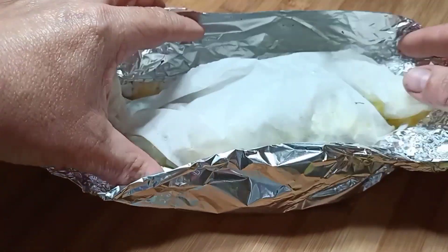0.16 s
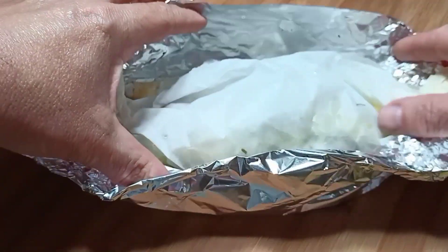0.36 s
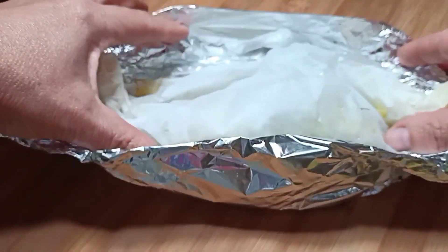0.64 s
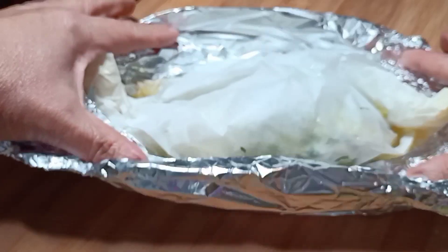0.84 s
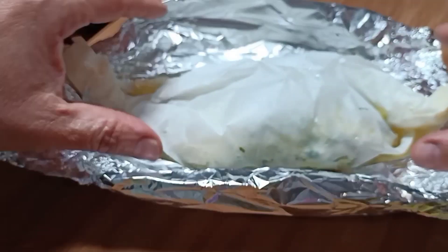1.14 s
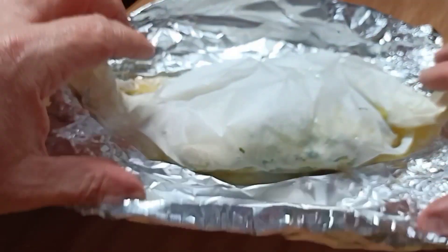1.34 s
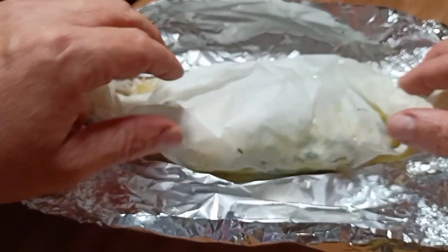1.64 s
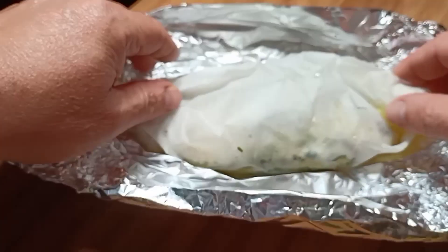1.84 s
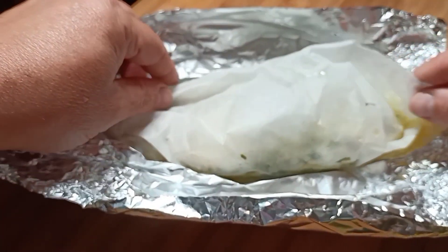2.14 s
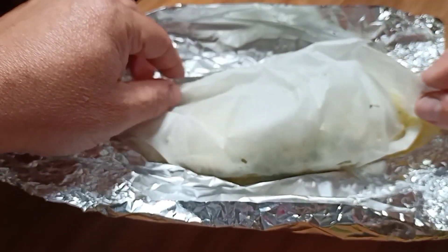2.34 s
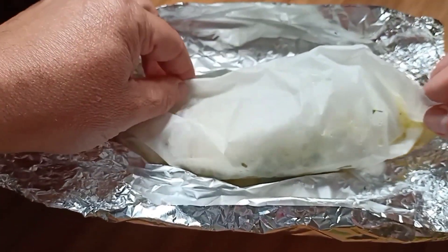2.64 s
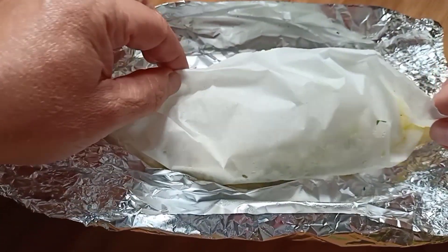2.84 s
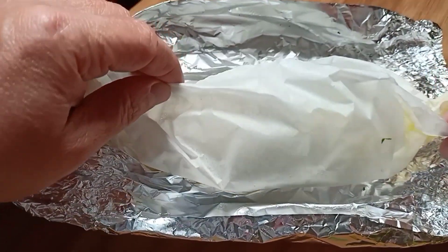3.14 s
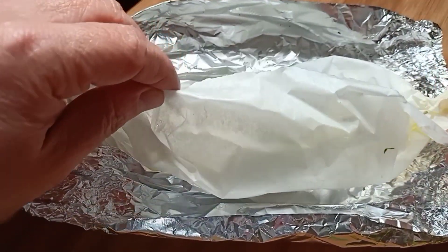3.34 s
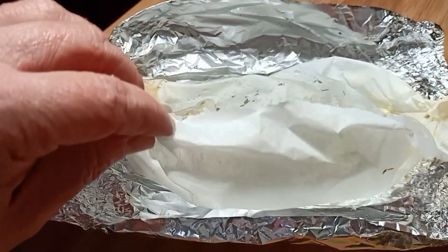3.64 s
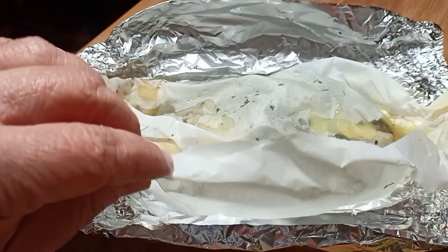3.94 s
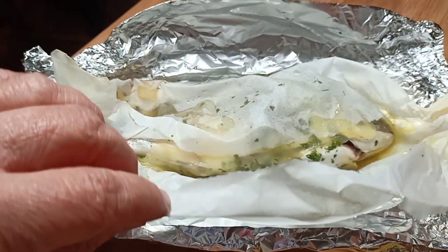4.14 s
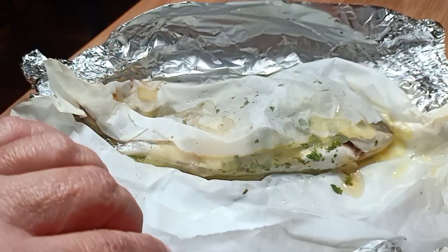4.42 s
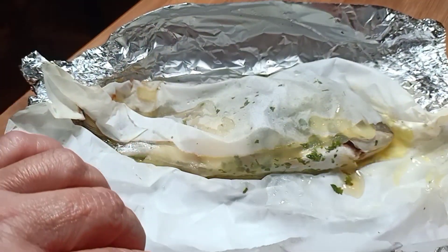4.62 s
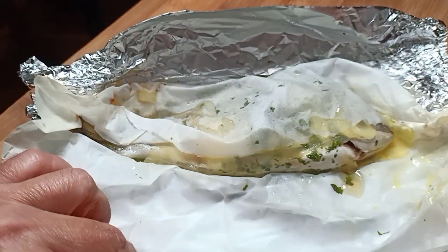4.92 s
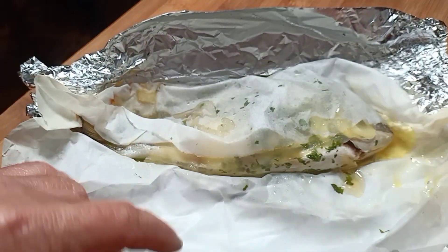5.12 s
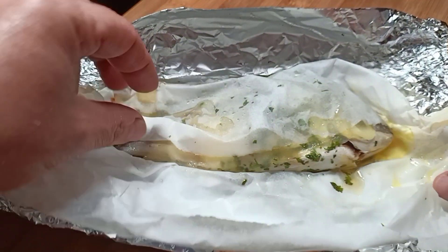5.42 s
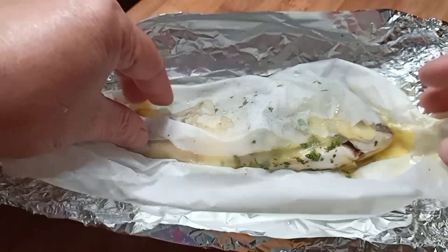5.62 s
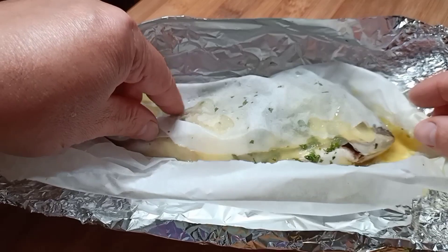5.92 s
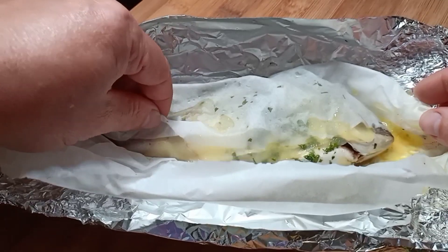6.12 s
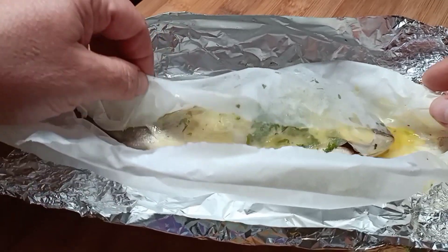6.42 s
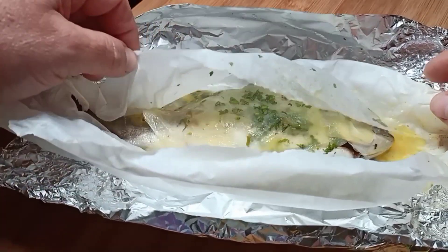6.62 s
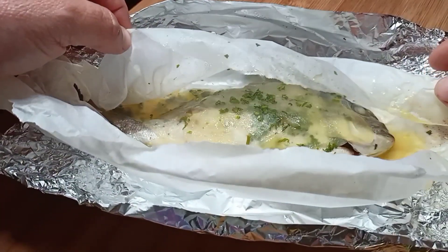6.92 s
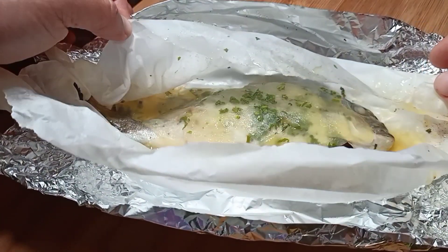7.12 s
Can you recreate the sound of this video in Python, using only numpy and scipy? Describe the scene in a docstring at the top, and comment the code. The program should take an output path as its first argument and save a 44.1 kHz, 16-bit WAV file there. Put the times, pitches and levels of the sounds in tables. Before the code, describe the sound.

Aluminium foil and baking paper crinkle as hands unwrap a food parcel up close, loud crackles first, then soft rustling and dense crackling.

```python
"""Hands open a parcel of aluminium foil and baking paper on a wooden kitchen table, close to a phone.
Hard pulls come first: creases buckle as random clicks, ridges snap as damped tones, panels pop hollowly.
From 2 s the pulls are gentler and the paper, held taut, rings; from 3.2 s the crackle is dense and slack.
From 5.4 s taut paper again colours softer pulls, and the last snaps follow near 7.2 s. Now and then the
parcel bumps the table in filtered noise; a short kitchen reverberation and a faint hush lie behind it all."""
import sys
import numpy as np
from scipy import signal
from scipy.fft import rfft, irfft
from scipy.io import wavfile
from scipy.ndimage import uniform_filter1d

SR = 44100
rng = np.random.default_rng(int(sys.argv[2]) if len(sys.argv) > 2 else 0)


def transcribe(signal):
    """Save signal, clipped to [-1, 1], as a 16-bit WAV file at the path in sys.argv[1]."""
    frames = np.atleast_2d(signal).T
    limited = np.clip(frames, -1, 1)
    pcm = np.round(limited * 32767).astype(np.int16)
    wavfile.write(sys.argv[1], SR, pcm)


N = 320166
TIME = np.arange(N) / SR
TOP_HZ = 15500

# radiation spectrum of the crumpling sheet: (frequency [Hz], level [dB])
SHEET_SPECTRUM = [(90, -28), (330, -2), (620, 1), (1000, -3), (1450, -1), (2650, -1.3), (3300, -13.5),
                  (4500, -14.5), (7000, -27), (7600, -38.5), (12500, -47), (15000, -52)]


def wrapping():
    """Crackling noise: harder pulls break more creases a second; broad panels sound low, tight folds high."""
    fold_db, panel_db, tick_db = effort()
    creases_per_s = 1200 * undb(0.2 * (fold_db - fold_db.mean()))
    creases = pinched(crumple(creases_per_s))
    panels = driven(band(creases, 130, 830, order=4), panel_db)
    folds = driven(band(creases, 826, 3960, order=6), fold_db)
    ticks = driven(band(creases, 3540, TOP_HZ, order=4), tick_db)
    return panels + folds + ticks


def effort(attack_s=0.0018, jerk_db=2, jerks_per_s=22):
    """Power addition: each pull rises, holds and decays exponentially; overlapping pulls add their power.

    Returns the levels in dB of folds, panels and ticks."""
    # pulls of the hands: (start [s], length [s], crinkling folds [dB], flexing panels [dB over the folds],
    # finest ticks [dB over the folds])
    pulls = [(0.0, 0.073, -46.5, 4, -8), (0.082, 0.21, -51, 3, -10.5), (0.311, 0.21, -48.5, 4.5, -9),
             (0.477, 0.41, -48.5, -3, -11.5), (0.517, 0.029, -36.5, -0.5, -12),
             (0.572, 0.077, -39, 2.5, -15.5), (1.028, 0.26, -63.5, -41, 3), (1.071, 0.13, -47.5, 0, -7.5),
             (1.442, 0.037, -51, 5.5, -9.5), (1.5, 0.27, -53, -1, -13.5), (1.819, 0.1, -53.5, -1, -10),
             (2.082, 0.045, -56, -5.5, -15), (2.277, 0.44, -66, -12.5, -4.5),
             (2.464, 0.055, -58.5, -9, -14), (2.671, 0.11, -63.5, 3.5, -12.5),
             (2.868, 0.721, -56, -4.5, -14.5), (2.937, 0.21, -57.5, 2.5, -12), (3.21, 0.15, -55.5, -2, -46),
             (3.332, 0.046, -53.5, 1, -6.5), (3.568, 0.17, -55, 3.5, -8.5), (3.738, 0.092, -51, 1.5, -14.5),
             (3.878, 0.42, -49, -0.5, -10), (4.368, 0.34, -52.5, -3, -7.5), (4.547, 0.1, -48, -1.5, -8.5),
             (4.726, 0.255, -52, -9, -7), (5.041, 0.13, -51, -21.5, -13.5), (5.184, 0.17, -54, 3.5, -13.5),
             (5.584, 0.25, -56, -10, -12.5), (5.769, 0.063, -63, 1.5, -3), (5.926, 0.12, -67.5, -0.5, -1.5),
             (6.139, 0.014, -53.5, -3, -12.5), (6.151, 0.16, -63, -1.5, -8.5), (6.358, 0.26, -56, -4, -12),
             (6.493, 0.034, -53, 7.5, -12.5), (6.642, 0.014, -48, -1.5, -15.5),
             (6.702, 0.25, -57, -3.5, -17), (6.861, 0.03, -50, 4.5, -10.5), (6.94, 0.1, -54, -1.5, -10.5),
             (7.058, 0.16, -51, 1, -10.5)]
    # decay after a pull, the hands damping the broad panels soonest:
    # (folds [dB/s], panels [dB/s], ticks [dB/s])
    release_rates = (289, 380, 242)
    # the sheet settling between pulls: (folds [dB], panels [dB], ticks [dB])
    settling_levels = (-68, -85, -82)
    power = undb(settling_levels)[:, None] ** 2 * np.ones(N)
    for start_s, length_s, fold_db, panel_db, tick_db in pulls:
        t = TIME[:int(length_s * SR) + SR // 2]
        rise = np.minimum(t / attack_s, 1)
        since_release_s = np.maximum(t - length_s, 0)
        for track, relative_db, release in zip(power, (0, panel_db, tick_db), release_rates):
            stroke = rise * undb(fold_db + relative_db - release * since_release_s)
            add(track, start_s, stroke ** 2)
    # the sheet yields unevenly
    return 10 * np.log10(power) + jerk_db * walk(jerks_per_s)


def crumple(rate, wander_db=4.0, rub=0.05, spread_db=4.8, patchy_db=2.5, lag_s=0.00035,
            sharpness=4.2, octaves=0.5, count=30):
    """Impulse excitation of modes: creases buckle at random, each ringing short modes around its own pitch."""
    at = np.flatnonzero(rng.random(N) < rate / SR)
    # many small creases and a few large
    crease_size = undb(spread_db * np.minimum(rng.exponential(size=N)[at], 2.4))
    pitch_hz = 100 * 160 ** rng.random(N)[at]
    out = np.zeros(N)
    for hz in np.geomspace(150, 14000, count):
        noise = rng.standard_normal(N)
        nearness = np.exp(-0.5 * (np.log2(hz / pitch_hz) / octaves) ** 2)
        # a buckle runs along its crease, so its modes start a moment apart
        lag = (lag_s * SR * np.abs(noise[at])).astype(int)
        start = np.minimum(at + lag, N - 1)
        patchiness = undb(patchy_db * np.minimum(noise[at - 1], 2))
        strength = crease_size * nearness * patchiness * np.sign(noise[at])
        # sheet sliding on sheet rubs the same modes
        kicks = np.bincount(start, strength, N) + rub * noise
        mode = signal.iirpeak(hz, sharpness, fs=SR)
        ringing = signal.lfilter(*mode, signal.lfilter(*mode, kicks))
        # as the sheet bends, different facets take over the sound
        out += ringing * undb(wander_db * walk(rate=20))
    return colour(out, SHEET_SPECTRUM)


def driven(x, db):
    """Energy balance: the hands feed in the power, and the creases of each short moment share it."""
    power = uniform_filter1d(uniform_filter1d(x ** 2, size=2600), size=1300)
    return undb(db) * x / np.sqrt(power + 0.029 * np.mean(power))


def pinched(x, slack=0.3, drift=0.07, wander_db=4):
    """Stretched-membrane resonance: paper held by fingertips rings at pitches that shift with its tension."""
    # fingertips hold the paper taut: (from [s], to [s])
    pinches = [(1.97, 3.2), (5.42, 6.85)]
    # resonances of the taut paper, before drift and wander: (frequency [Hz], width [Hz], level [dB])
    taut_modes = [(360, 33, -8), (608, 66, 3.5), (854, 50, -1), (1845, 98, 2), (2680, 140, -6.5),
                  (3200, 170, -5), (4060, 430, -7.5)]
    held = sum(1.0 * ((TIME > begin_s) & (TIME < end_s)) for begin_s, end_s in pinches)
    grip = uniform_filter1d(held, SR // 10)
    taut = np.zeros(N)
    for hz, width_hz, db in taut_modes:
        gain = undb(db + wander_db * walk(6.2))
        moving_hz = hz * np.exp(drift * walk(4.6))
        taut += gain * ring(x, moving_hz, width_hz)
    # under full grip the unresonant sound drops to the slack gain
    return x + grip * (taut + (slack - 1) * x)


def snaps(ring_s=0.0011, crack_s=0.001, softness=0.85, size=1400):
    """Snap-through buckling: a ridge flips with a sharp noise crack and a few cycles of damped modes."""
    # ridges, levels being peaks at the sheet: (time [s], ring level [dB], ring pitch [Hz], crack level [dB])
    ridges = [(0.1743, -29, 1710, -38.5), (0.3156, -35, 2550, -35), (0.5265, -28, 2290, -33),
              (0.5776, -25, 2020, -37), (0.603, -18, 2100, -27), (0.6394, -23.5, 2500, -40),
              (0.6963, -21, 1900, -34), (1.1301, -25, 1890, -38), (1.2435, -27, 1930, -48),
              (1.287, -36.5, 2970, -33.5), (1.4505, -33, 2130, -60), (1.908, -35.5, 2076, -53.5),
              (2.2318, -54, 3210, -65), (2.2878, -36.5, 1930, -44), (2.434, -45.5, 1784, -62.5),
              (2.493, -40.5, 2184, -60), (2.522, -48, 1920, -54.5), (2.533, -49, 2630, -46),
              (2.7223, -43.5, 1690, -47), (2.7798, -40.5, 1797, -78.5), (2.8513, -67.5, 1880, -38.5),
              (2.9354, -36, 1770, -41), (3.2159, -24.5, 1320, -37.5), (3.5798, -27.5, 1120, -42),
              (3.6516, -30.5, 1810, -42.5), (3.7661, -28.5, 1070, -41), (3.8267, -31, 1780, -32.5),
              (3.884, -28.5, 1650, -58), (3.908, -27, 2340, -34), (4.125, -30.5, 2230, -35.5),
              (4.195, -28, 2600, -35), (4.3822, -30, 2900, -59), (4.4573, -35, 1240, -43),
              (4.55, -28.5, 2490, -45), (4.5696, -23.5, 2550, -29.5), (4.6005, -28.5, 1760, -32),
              (4.608, -37, 2500, -40), (4.66, -30, 1430, -36), (4.7012, -36, 1160, -34),
              (4.7444, -37, 2380, -47), (4.809, -31.5, 1190, -34), (4.833, -39, 3500, -41),
              (4.992, -28, 1270, -31), (5.039, -33, 2270, -41), (5.0596, -30, 1530, -37),
              (5.095, -34.5, 1820, -36), (5.3102, -28, 1220, -40.5), (5.468, -41.5, 2570, -49),
              (5.5967, -51, 2810, -41), (5.6401, -47, 1920, -60.5), (5.6725, -36.5, 2710, -39),
              (5.8205, -62, 2560, -37), (5.927, -59, 2710, -56), (5.997, -63, 3300, -54.5),
              (6.0135, -43.5, 1770, -59), (6.1478, -39.5, 1874, -36.5), (6.2555, -36, 2580, -53.5),
              (6.3488, -33.5, 2790, -44), (6.434, -38.5, 2130, -37.5), (6.476, -32.5, 2000, -40),
              (6.835, -39, 2090, -41.5), (6.8825, -28.5, 2420, -45), (7.125, -27, 2200, -31.5),
              (7.195, -28.5, 1830, -40)]
    out, t = np.zeros(N), np.arange(size) / SR
    for s, ring_db, hz, crack_db in ridges:
        # a hard flip is a short click, a gentle one is slower and rings longer
        decay_s = ring_s * undb(-softness * np.clip(ring_db + 35.0, -10, 6))
        # a bent facet has a mode on either side of its strongest one, fainter in a gentle flip
        ratios = np.exp(np.array([0, -1, 0.5]) * rng.uniform(0.49, 1, size=3))
        weights = np.array([2.2 * decay_s / ring_s + 1, 1, 1])
        modes = weights @ np.sin(2 * np.pi * hz * ratios[:, None] * t)
        note = band(modes * np.sqrt(t) * np.exp(-t / decay_s), 770, 3800, order=3)
        burst = rng.standard_normal(size) * t * np.exp(-t / crack_s)
        crack = band(colour(burst, SHEET_SPECTRUM), 3200, TOP_HZ)
        note_part = undb(ring_db) * note / np.abs(note).max()
        crack_part = undb(crack_db) * crack / np.abs(crack).max()
        add(out, s, note_part + crack_part)
    return out


def pops(rise_cycles=0.63, softness=0.41, size=2200):
    """Volume displacement: a whole panel turns over and pushes the air in a few damped cycles."""
    # panels of paper and foil: (time [s], envelope level before the band-pass [dB], pitch [Hz])
    popping_panels = [(0.172, -35, 473), (0.465, -21.5, 435), (0.536, -24.5, 573), (0.585, -23, 573),
                      (0.892, -39, 410), (1.152, -42, 525), (1.501, -32, 565), (2.472, -43, 572),
                      (2.762, -48, 416), (2.948, -35.5, 706), (3.1, -36.5, 510), (3.2155, -35.5, 830),
                      (3.386, -34.5, 600), (3.579, -35.5, 600), (3.591, -32.5, 413), (3.651, -30.5, 590),
                      (3.764, -27.5, 614), (3.882, -28.5, 520), (4.047, -30, 840), (4.0475, -31.5, 351),
                      (4.279, -37, 626), (4.567, -30, 557), (6.141, -41, 726), (6.2805, -48, 820),
                      (6.495, -40.5, 775), (6.504, -36, 528), (6.536, -34.5, 522), (6.622, -31, 592),
                      (6.784, -43, 830), (7.074, -37, 530), (7.126, -37, 442), (7.17, -37, 454)]
    out, t = np.zeros(N), np.arange(size) / SR
    for s, db, hz in popping_panels:
        # a gentle pop swings on for longer
        age = hz * t / (rise_cycles * undb(-softness * min(db + 26, 0)))
        upper_hz = hz * rng.uniform(1.22, 1.92)
        swing = np.sin(2 * np.pi * hz * t) + 0.48 * np.sin(2 * np.pi * upper_hz * t)
        add(out, s, undb(db) * age * np.exp(1 - age) * swing)
    return band(out, 200, 4000)  # a thin sheet radiates little bass


def tray(x, direct_db=-0.5):
    """Forced resonance: the stiff foil tray under the paper rings briefly with whatever moves in it."""
    # resonances of the tray: (frequency [Hz], width [Hz], level [dB])
    tray_modes = [(329.5, 30, -6), (908, 9.8, -9.5), (1900, 51, -16.5), (2510, 86, -11)]
    ringing = sum(undb(db) * ring(x, np.full(N, hz), width_hz) for hz, width_hz, db in tray_modes)
    return undb(direct_db) * x + ringing


def nudges(decay_s=0.029, size=9000):
    """Damped impact: the soft, heavy parcel shifts on the table with a dull bump of low noise."""
    # bumps before the kitchen's reverberation: (time [s], peak level [dB])
    bumps = [(0.575, -33), (1.157, -41), (1.448, -42.5), (1.5, -38.5), (3.586, -41), (3.751, -46.5),
             (4.035, -43.5), (4.179, -45), (6.625, -54)]
    out, t = np.zeros(N), np.arange(size) / SR
    for s, db in bumps:
        bump = band(rng.standard_normal(size) * np.exp(-t / decay_s), 86, 380)
        add(out, s, undb(db) * bump / np.abs(bump).max())
    return out


def kitchen(x, t60_s=0.47, tail_db=-5, gap_s=0.0059, size=22000):
    """Exponential reverberation: cupboards and walls return a dense, bright, short tail with little bass."""
    t = np.arange(size) / SR
    tail = rng.standard_normal(size) * undb(-60 * t / t60_s) * (t > gap_s)
    # unit energy before the band-pass
    tail = band(tail / np.linalg.norm(tail), 520, 5600, order=1)
    return x + undb(tail_db) * signal.fftconvolve(x, tail)[:N]


def still_air(rms_db=-64.5):
    """Stationary broadband noise: the faint, dull hush of the room."""
    hush = colour(rng.standard_normal(N), [(45, -11.5), (150, -7.5), (2500, -6.5), (8000, -36)])
    return undb(rms_db) * hush / hush.std()


def suppress(x, memory=0.93, depth_db=-10, size=704):
    spectrum = signal.stft(x, nperseg=size)[2]
    power = np.abs(spectrum) ** 2
    # the quietest moments of each band give its hush
    hush = np.quantile(uniform_filter1d(power, size=10, axis=1), 0.03, axis=1)
    passed, gains = 0, []
    for now in power.T / (hush + 1e-20):
        excess = memory * passed + (1 - memory) * np.maximum(now - 1, 0)
        gain = np.maximum(excess / (1 + excess), undb(depth_db))
        gains.append(gain)
        passed = gain ** 2 * now
    return signal.istft(spectrum * np.transpose(gains))[1][:N]


def ring(x, hz, width_hz):
    """Heterodyne resonator: one resonance whose centre may move, with gain 1 at the centre."""
    turn = np.exp(2j * np.pi * np.cumsum(hz) / SR)
    keep = np.exp(-np.pi * width_hz / SR)
    envelope = signal.lfilter([1 - keep], [1, -keep], x / turn)
    return 2 * np.real(turn * envelope)


def colour(x, points, size=2048):
    """Minimum-phase filter with the given (Hz, dB) outline, so that clicks keep their sharp fronts."""
    hz, db = np.transpose(points)
    log_hz = np.log(np.linspace(1, SR / 2, size // 2 + 1))
    cepstrum = irfft(np.log(undb(np.interp(log_hz, np.log(hz), db))))
    # folding the cepstrum onto positive time makes the filter causal
    cepstrum[1:size // 2] *= 2
    cepstrum[size // 2 + 1:] = 0
    impulse_response = irfft(np.exp(rfft(cepstrum)))
    return signal.fftconvolve(x, impulse_response)[:len(x)]


def band(x, lo_hz, hi_hz, order=2):
    """Causal Butterworth band-pass: maximally flat between its edges."""
    sos = signal.butter(order, [lo_hz, min(hi_hz, SR / 2 - 1)], "band", fs=SR, output="sos")
    return signal.sosfilt(sos, x + 1e-18)


def walk(rate):
    """Interpolated random process: normal values, rate of them a second, joined by straight lines."""
    return np.interp(TIME * rate, np.arange(1000), rng.standard_normal(1000))


def undb(db):
    """Logarithmic level: decibels to amplitude gain."""
    return 10 ** (np.asarray(db) / 20)


def add(track, s, sound):
    """Superposition: mix a sound into the track from time s in seconds."""
    i = max(int(s * SR), 0)
    track[i:i + len(sound)] += sound[:N - i]


def scene():
    """Superposition of sources: wrapping in its tray and bumps on the table, in the kitchen, over the hush."""
    parcel = tray(wrapping() + snaps() + pops())
    return (kitchen(parcel + nudges()) + still_air())[None]


def record(dry):
    """Band limitation: the phone suppresses the hush, and an elliptic low-pass cuts the top."""
    low_pass = signal.ellip(8, 0.2, 70, TOP_HZ, fs=SR, output="sos")
    return signal.sosfilt(low_pass, suppress(dry[0]))[None]


dry = scene()
out = record(dry)
transcribe(out)
```